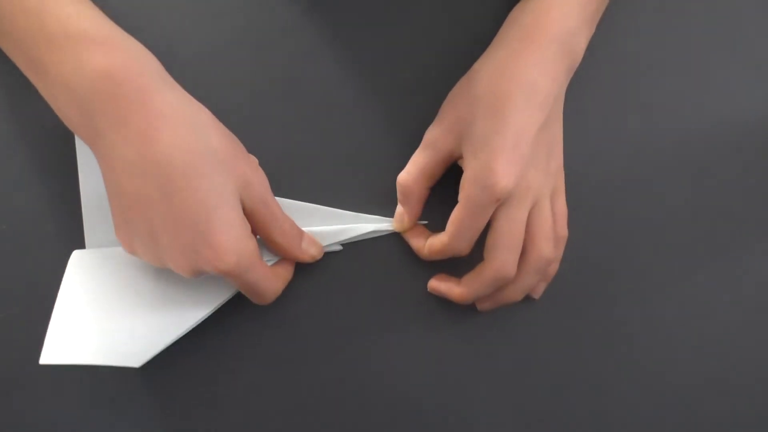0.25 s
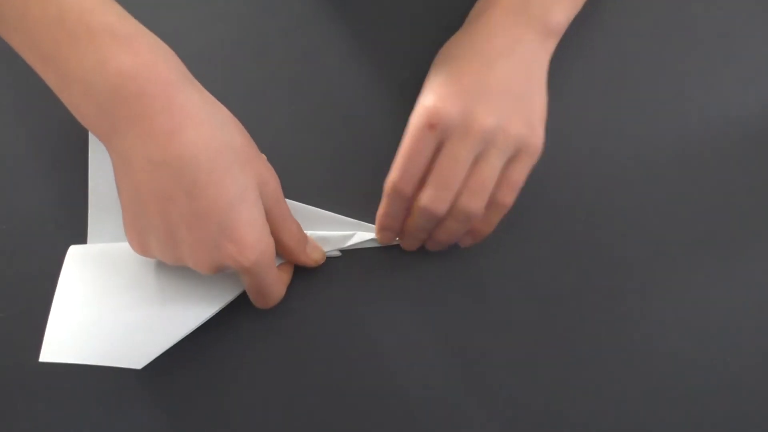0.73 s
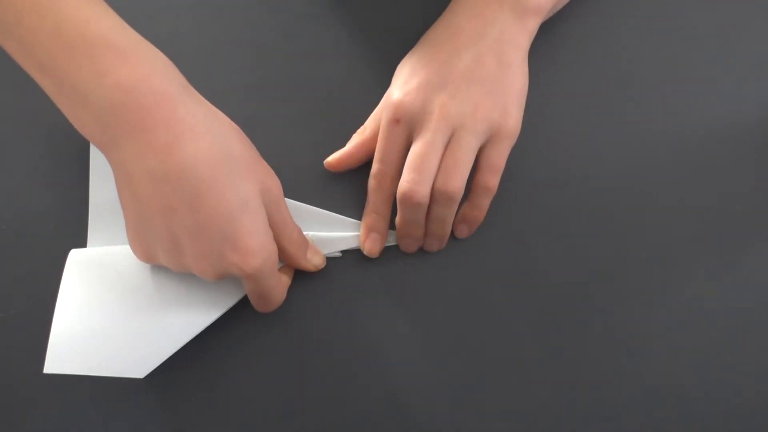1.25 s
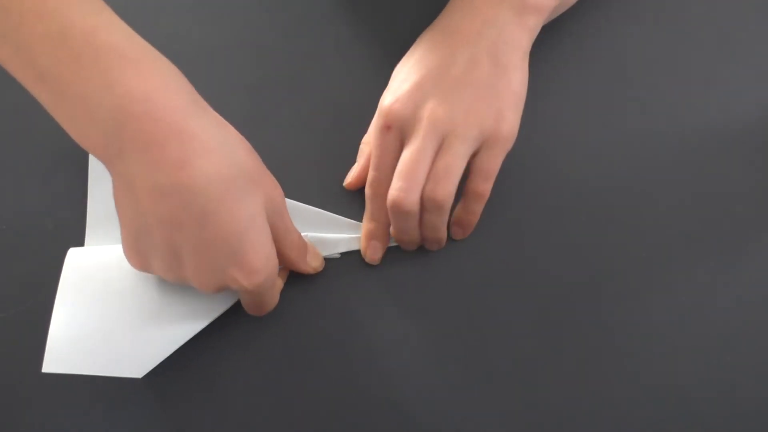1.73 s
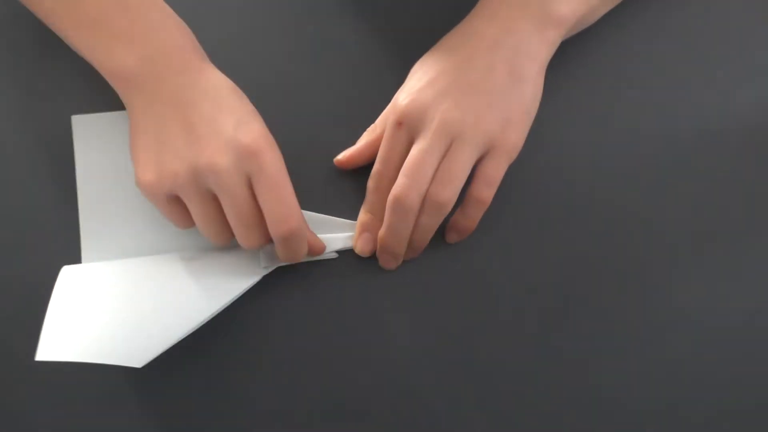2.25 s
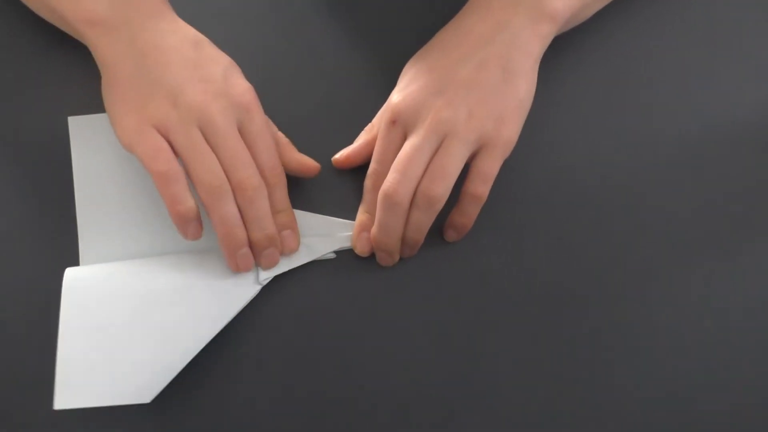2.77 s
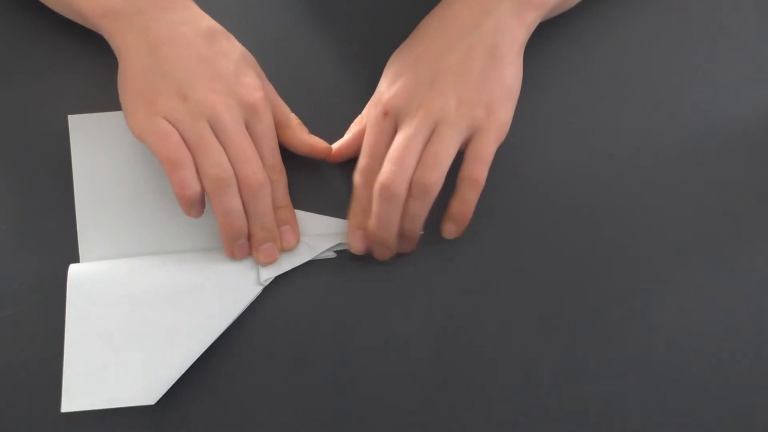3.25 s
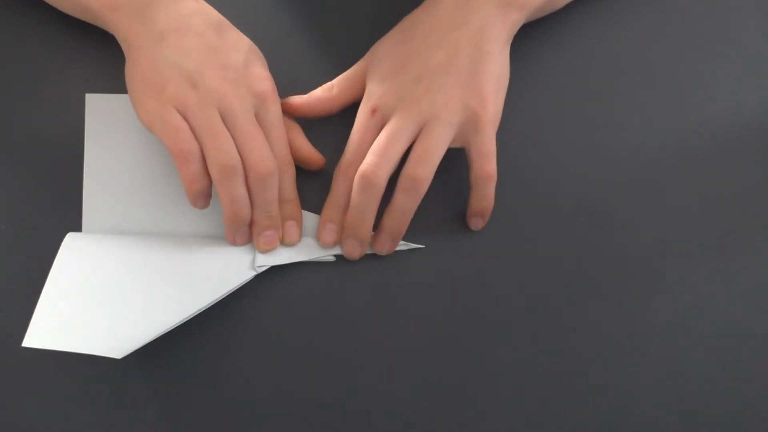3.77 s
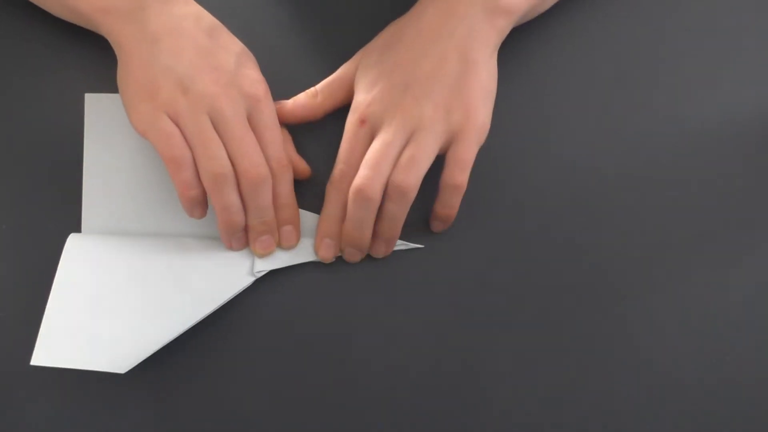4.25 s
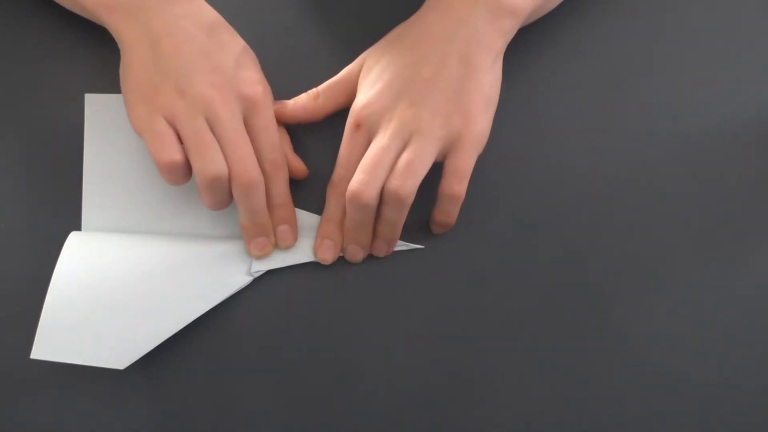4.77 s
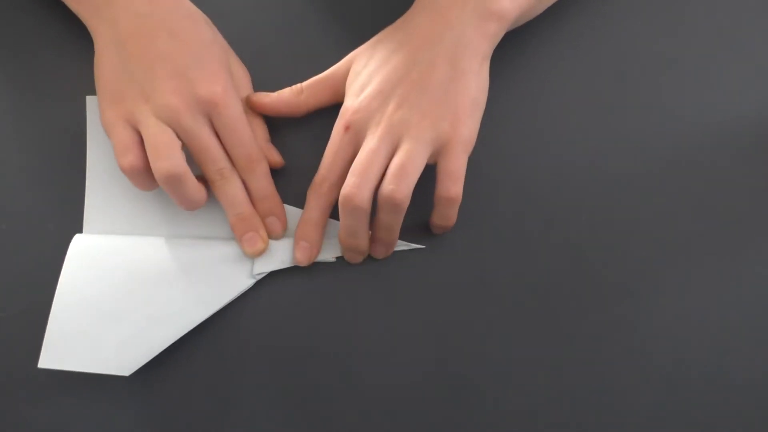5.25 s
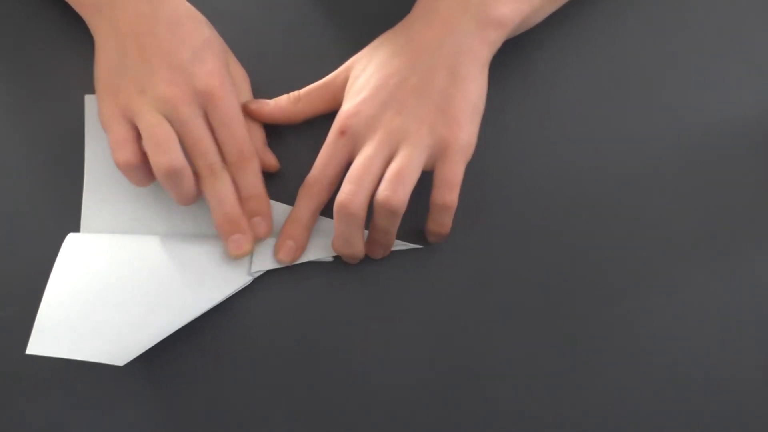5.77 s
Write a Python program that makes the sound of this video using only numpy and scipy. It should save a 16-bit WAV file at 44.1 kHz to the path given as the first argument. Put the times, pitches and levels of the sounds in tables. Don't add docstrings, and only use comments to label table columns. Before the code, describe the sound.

A quiet small room with soft hiss, deep rumble and a very faint electric whine; paper is handled close to the microphone. A crisp snap at 0.05 s opens, then light pinching crackles from 0.2 to 0.5 s. At 0.6 s a scuff of fingers and low table thuds begin the bending, with snaps near 0.7, 0.87 and 1.0 s and a knock and crackle around 1.35 s. The loudest, sharpest crease snap hits at 1.53 s, followed by quick hollow pops to 1.75 s and another crack at 1.8 s. Soft finger swishes run 2.1-2.5 s. A small press snap at 3.0 s leads into sparse ticks and a short bright skid at 3.6 s. A heavy, low cluster of thuds lands at 4.3 s, a bright crack with a duller one at 4.65 s, lesser crackles at 4.94 s, a soft thud at 5.3 s, a press snap at 5.63 s and a closing snap at 6.0 s.

```python
import sys
import numpy as np
from scipy import signal
from scipy.fft import rfft, irfft, next_fast_len
from scipy.io import wavfile
from scipy.ndimage import uniform_filter1d, minimum_filter1d

SR = 44100
rng = np.random.default_rng(int(sys.argv[2]) if len(sys.argv) > 2 else 0)


def pcm_store(signal):
    levels = np.round(np.clip(np.atleast_2d(signal), -1, 1) * 32767)
    wavfile.write(sys.argv[1], SR, levels.astype(np.int16).T)


def volts_from_db(level):
    exponent = np.asarray(level, float) / 20
    return 10 ** exponent


N = 265261


def evened(x):
    return x / np.sqrt(np.mean(x ** 2) + 1e-20)


def read(points, hz):
    f, value = np.transpose(points)
    return np.interp(np.log(hz + 1), np.log(f + 1), value)


def coloured(x, points):
    n = next_fast_len(x.shape[-1], real=True)
    gain = volts_from_db(read(points, np.fft.rfftfreq(n, 1 / SR)))
    return irfft(rfft(x, n) * gain, n)[..., :x.shape[-1]]


def add(mix, s, sound):
    part = mix[round(s * SR):][:len(sound)]
    part += sound[:len(part)]


# frequency in Hz, level in dB.
RUMBLE_SPECTRUM = [(15, -16), (30, 11), (50, 12), (70, 17), (95, -41)]


def building_rumble():
    return volts_from_db(-65.5) * evened(coloured(rng.standard_normal((2, N)), RUMBLE_SPECTRUM))


# frequency in Hz, level in dB per Hz.
AIR_SPECTRUM = [(12, -52), (20, -24), (86, -54), (124, -3), (147, -3), (211, -7), (403, -8.5), (565, -20),
                (1200, -14.5), (1940, -18.5), (2110, -12), (3600, -26), (9620, -28), (15400, -36),
                (16400, -48)]
# frequency in Hz, likeness from 0 to 1.
AIR_LIKENESS = [(60, 0.15), (180, 0.24), (550, 0.038), (1650, 0.083), (3600, 0.7), (5400, 0.82),
                (5800, 0.99), (9000, 1)]
# frequency in Hz, level in dB.
WHINE = [(2708, -67.5)]


def room_tone():
    hz = np.fft.rfftfreq(1024, 1 / SR)
    a, b, c, d, patches = rng.standard_normal((N // 256 + 5, 513, 5)).T
    patches = uniform_filter1d(patches, 10, axis=0)
    patches = evened(uniform_filter1d(patches, 12, axis=1))
    same = np.clip(read(AIR_LIKENESS, hz), -1, 1)[:, None]
    left = a + 1j * b
    right = same * left + np.sqrt(1 - same ** 2) * (c + 1j * d)
    spectra = np.array([left, right]) * volts_from_db(1.6 * patches)
    hiss = signal.istft(spectra, nperseg=1024, noverlap=768)[1][:, :N]
    wash = evened(coloured(hiss, AIR_SPECTRUM))
    t = np.arange(N) / SR
    whine = sum(volts_from_db(db + 4) * np.sin(2 * np.pi * hz * t) for hz, db in WHINE)
    return volts_from_db(-53) * wash + whine


# frequency in Hz, time to fall 60 dB in seconds.
WALL_DECAY = [(500, 0.37), (1500, 0.18), (4000, 0.27), (10000, 0.22)]
# delay in seconds, level in dB.
NEAR_ECHOES = [(.0012, -27), (.0045, -28), (.0098, -20.5), (.0125, -15), (.017, -28)]


def room(x, wet_db):
    taps = np.zeros((2, SR // 2))
    at = np.arange(400, SR // 2 - 20, 20) + rng.integers(0, 20, (2, (SR // 2 - 401) // 20))
    np.put_along_axis(taps, at, rng.choice([-1., 1.], at.shape), 1)
    hz, t, z = signal.stft(taps, SR, nperseg=256)
    decay = volts_from_db(-60 * t / read(WALL_DECAY, hz)[:, None])
    tail = signal.istft(z * decay, SR, nperseg=256)[1]
    tail *= volts_from_db(wet_db) / np.linalg.norm(tail[0])
    for k, (s, db) in enumerate(NEAR_ECHOES):
        echo = (-1) ** k * volts_from_db(db)
        tail[0, round(s * SR)] += echo
        tail[1, round(s * SR) + 3 * k] += echo
    return signal.fftconvolve(x[None], tail, axes=1)[:, :N]


USUAL_DB = -51
# time in seconds, effort in dB.
HAND_EFFORT = [(0.0, -46.5), (0.32, -49), (0.55, -45), (1.39, -44.5), (1.52, -44.5), (1.81, -53.5),
               (1.94, -42.5), (2.24, -66.5), (2.43, -48), (2.609, -62), (2.85, -57), (3.52, -54),
               (3.89, -55.5), (4.54, -50), (4.77, -56.5), (5.5, -53), (5.85, -50), (6.01, -51)]


def effort():
    return np.interp(np.arange(N) / SR, *np.transpose(HAND_EFFORT)) - USUAL_DB


# frequency in Hz, width in Hz, level in dB.
TABLE_MODES = [(118.3, 9.7, -8.5), (129.6, 14.7, -2), (164, 25.5, 0), (223.7, 20.2, -1), (281.5, 53, -2),
               (396, 30, -13), (467, 13, -21)]
# start in seconds, level in dB, hold in seconds, upper modes in dB.
HAND_LEANS = [(0.0, -52, 0.087, -2), (0.296, -58.5, .2, 6.5), (0.612, -37.5, .1, -11),
              (0.88, -47.5, 0.0087, -4.5), (1.03, -47.5, 0.1, -4.5), (1.37, -46.5, 0.018, 1),
              (1.547, -53.5, 0.16, 9.5), (1.97, -58, .04, -21), (2.275, -57, .01, -14),
              (2.46, -59, .01, -21), (2.89, -56, .11, -6), (3.656, -50.5, 0.033, -14),
              (3.914, -51.5, .01, 1), (4.298, -43.5, 0.05, -5), (4.668, -51, 0.009, -5.5),
              (5.355, -48, .04, -9), (5.623, -60, 0.036, 7.5), (5.83, -61, 0.026, 2)]
# start in seconds, level in dB, hardness from 0 to 1.
TABLE_THUDS = [(0.601, -38.5, 0.8), (0.642, -37, 0.4), (1.021, -45, 0.1), (1.364, -39, 0.88),
               (2.255, -39, 0.1), (3.0, -43, 0.34), (4.297, -29.5, 0.69), (4.3149, -35, 0.5),
               (4.341, -33, 0.4), (4.393, -31.5, 0.04), (5.299, -38.5, 0.2), (5.819, -40.5, 0.63)]


def table_top():
    t, now = np.arange(SR // 3) / SR, np.arange(N) / SR
    rise_db_s, fall_db_s, rest_db = 202, 192, -62
    s, db, hold, upper_db = np.transpose(HAND_LEANS)[..., None]
    before, after = np.maximum(s - now, 0), np.maximum(now - s - hold, 0)
    weight = volts_from_db(db - rise_db_s * before - fall_db_s * after)

    modes = [volts_from_db(level - 8.7 * np.pi * width * t) * np.sin(2 * np.pi * hz * t)
             for hz, width, level in TABLE_MODES]
    pushes = rng.standard_normal(N)
    low = evened(signal.oaconvolve(pushes, sum(modes[:2]))[:N])
    upper = evened(signal.oaconvolve(pushes, sum(modes[2:]))[:N])
    low_level = weight.sum(0) + volts_from_db(rest_db)
    upper_level = volts_from_db(-57.5 + 0.98 * effort()) + (volts_from_db(upper_db) * weight).sum(0)
    out = volts_from_db(-3.5) * (low_level * low + upper_level * upper)

    onset = 1 - np.exp(-t / 0.0032)
    for start, thud_db, hard in TABLE_THUDS:
        ring = sum(m * volts_from_db(7.5 * (hard - .5) * k) for k, m in enumerate(modes))
        add(out, start, volts_from_db(thud_db) * ring * onset)
    return coloured(out, [(40, -17), (75, -3.5), (105, -2.0), (600, 2.5)])


# start in seconds, length in seconds, frequency in Hz, level in dB.
SKIN_SQUEAK = (4.628, .015, 4850, -54)


def squeak():
    s, length, hz, db = SKIN_SQUEAK
    t, out = np.arange(0, length, 1 / SR), np.zeros(N)
    add(out, s, volts_from_db(db) * np.sin(2 * np.pi * hz * t) * np.hanning(len(t)) ** .5)
    return out


def friction(points, per_s, spread_db, clump_db):
    size = volts_from_db(spread_db * np.minimum(rng.exponential(1, N), 2))
    catches = size * (rng.random(N) < per_s / SR)
    clumps = uniform_filter1d(np.sqrt(catches), size=300)
    clumps = uniform_filter1d(clumps, size=200)
    grip = volts_from_db(clump_db * evened(clumps - clumps.mean()))
    scrape = grip * (0.43 * evened(catches) + 1) * rng.standard_normal(N)
    return evened(coloured(scrape, points))


# frequency in Hz, level in dB per Hz.
RUSTLE_SPECTRUM = [(290, -57), (500, -40), (1040, -1.5), (1560, -2.5), (2160, 0.5), (2370, -2.5),
                   (3270, -2.5), (8000, -20.5), (10400, -24), (17600, -120)]
# frequency in Hz, level in dB per Hz.
FIBRE_HISS_SPECTRUM = [(880, -11.5), (1500, -16), (2990, -9), (3800, -3), (5850, -8), (11300, -6.5),
                       (15500, -13.5), (16400, -38)]
# start in seconds, peak in dB, rise in seconds,
# length in seconds, brightness from 0 to 1.
FINGER_SKIDS = [(1.378, -42, .002, .04, 0.3), (0.692, -40, .002, .012, 0.15),
                (0.0185, -39, .002, .011, 0.05), (0.612, -44, .003, .026, 0.02),
                (3.008, -53, .003, .025, 0.02), (4.677, -42, .003, .012, 0.03),
                (0.585, -31.5, 0.00091, 0.056, 0.44), (0.844, -34, 0.003, 0.0096, 0.56),
                (0.987, -33, 0.0011, 0.0095, 0.3), (1.3655, -31, 0.002, 0.011, 0.25),
                (1.944, -39, 0.0037, 0.015, 0.52), (2.145, -47, 0.029, 0.042, 0.48),
                (2.221, -40.5, 0.062, 0.091, 0.5), (2.383, -43, 0.039, 0.05, 0.5),
                (2.468, -50, 0.012, 0.048, 0.48), (2.516, -50, 0.037, 0.12, 0.52),
                (3.26, -50, .001, 0.006, 1.), (3.606, -38.5, 0.0022, 0.044, 0.85),
                (3.898, -46, 0.002, 0.0065, 0.3), (3.916, -46, .002, 0.0063, 0.35),
                (4.4995, -49, .001, 0.0017, 0.85), (4.6425, -30, 0.0008, 0.005, 1.),
                (4.649, -40, .002, 0.023, 0.76), (4.665, -57, 0.0054, 0.067, 0.3),
                (4.693, -45, 0.0023, 0.0044, 1), (5.026, -54.5, .002, 0.014, 1.),
                (5.339, -49.5, .005, 0.043, 0.57), (5.601, -52, 0.0017, 0.0051, 0.7),
                (5.63, -48, .002, 0.057, 0.27), (5.788, -54, 0.012, 0.032, 0.8)]


def fingers():
    busy_db = effort()
    dull = volts_from_db(USUAL_DB + busy_db - 3.0)
    bright = volts_from_db(USUAL_DB - 12 + 0.99 * busy_db)
    for start, db, rise, length, shine in FINGER_SKIDS:
        u = np.arange(0, 2 * length, 1 / SR) / length
        swell = np.clip(u * length / rise, 0, 1)
        push = volts_from_db(db + 4.5 - 6.8 * u) * swell / (1 + u ** 12)
        add(dull, start, push * np.clip(1.1 - shine, 0, 1))
        add(bright, start, push * shine)
    rustle = friction(RUSTLE_SPECTRUM, per_s=1200, spread_db=8., clump_db=1.97)
    hiss = friction(FIBRE_HISS_SPECTRUM, per_s=5000, spread_db=5.0, clump_db=1.3)
    return dull * rustle + bright * hiss


# start in seconds, peak in dB, frequency in Hz,
# time to fall 60 dB in seconds.
AIR_POCKETS = [(0.051, -12, 2250, .013), (0.051, -13, 2750, .012), (0.322, -31, 850, .012),
               (0.3915, -29, 800, .012), (0.697, -26, 3100, .015), (0.7095, -25, 1250, .03),
               (0.743, -23, 1300, .025), (1.3325, -18, 2700, .013), (1.334, -21, 1050, .025),
               (1.3665, -28, 1000, .02), (1.572, -20, 1400, .025), (1.601, -20, 1300, .03),
               (1.655, -20, 1180, .035), (1.655, -24, 1840, .015), (1.680, -25, 1200, .025),
               (1.702, -23, 1200, .025), (1.725, -23, 1250, .03), (1.862, -27, 1300, .02),
               (1.927, -28, 1700, .02), (2.436, -36, 1000, .02), (2.565, -35, 1300, .02),
               (2.612, -37, 2550, .02), (2.994, -28, 1290, .025), (2.9935, -26, 3800, .016),
               (2.9935, -26, 4750, .016), (2.9935, -26, 2600, .016), (2.9935, -28, 1740, .018),
               (4.2742, -17, 2350, .015), (4.277, -30, 1300, .03), (4.643, -20, 10500, .008),
               (4.6565, -16, 1450, .03), (4.6565, -21, 2090, .02), (4.667, -30, 1500, .015),
               (4.94, -24, 1430, .025), (5.6295, -21, 1000, .025), (5.634, -27, 2450, .015),
               (5.6435, -24, 1370, .025), (5.643, -27, 2500, .02), (5.668, -29, 2450, .015)]


def pockets():
    out, t = np.zeros(N), np.arange(1500) / SR
    sag, shut = .12, .38
    onset = 1 - np.exp(-t / .0006)
    for s, db, hz, t60 in AIR_POCKETS:
        turns = np.cumsum(hz * (1 + sag * np.exp(-t / .002))) / SR
        fade_db = 60 * (t / (shut * t60)) ** 2
        add(out, s, volts_from_db(db - 3.2 - fade_db) * onset * np.sin(2 * np.pi * turns))
    return out


# frequency in Hz, level in dB.
SHEET_BODY = [(600, -40), (1000, 8), (1400, 14), (1800, 10), (2300, 13), (3200, 12), (4300, 3.5), (5500, 6),
              (7000, -6.5)]
# frequency in Hz, level in dB.
LOOSE_WING = [(450, -19.5), (700, -8.5), (1000, 1), (1250, -16.5), (1700, -37.5)]
# frequency in Hz, level in dB.
FIBRE_CRACK = [(2500, -5.5), (4500, 4), (6000, -3), (8000, -4.5), (11000, -9.5), (14000, -17), (16000, -34),
               (16600, -60)]


def snap(row, chance):
    s, db, centre_hz, treble_db, flap_db, width = row
    hz = np.fft.rfftfreq(2048, 1 / SR) + 1
    octaves_off = abs(np.log2(hz / centre_hz) / width)
    body = volts_from_db(read(SHEET_BODY, hz) - 6 * octaves_off ** 1.5)
    crack = volts_from_db(treble_db + 14.5 + read(FIBRE_CRACK, hz))
    flap = volts_from_db(flap_db + 13 + read(LOOSE_WING, hz))
    colour = body + crack + flap

    step, size, sign = chance.reshape(3, -1, 1)
    detour = .036 * (np.cumsum(step + .25, axis=0) - step[0] - .25)
    loss_db = 105 * detour * np.clip(4000 / hz, .6, 1) + (1.2 + 8 * size) * (detour > 0)
    late = 2 * (0.0552 + 0.593 * detour) * np.sqrt(hz) + 0.01418 * detour * hz
    spectra = colour * np.sign(sign - .5) * volts_from_db(-loss_db) * np.exp(-2j * np.pi * late)
    paths = irfft(spectra)[:, :1200]
    sound = paths.sum(0)
    sound = sound * volts_from_db(db) / abs(sound).max()
    plain = evened(paths[0]) * sound.std()
    return s - .0006, sound, plain


# start in seconds, peak in dB, centre in Hz, treble in dB, width in octaves.
HARD_CRACKS = [
    (0.0508, -9.5, 2300, -25, 0.53),
    (1.5263, 1.5, 3530, -21, 0.8),
    (1.8066, -10.5, 2930, -22, 1.09),
    (4.6432, -16, 5000, 0, 1.1),
    (4.655, -9.5, 2000, -40, 0.55),
    (5.628, -9, 2900, -18, 0.6),
    (6.0131, -8, 2150, -30, 0.4),
]
# start in seconds, peak in dB, centre in Hz, treble in dB.
PINCH_SNAPS = [
    (0.0205, -28, 1300, -24),
    (0.184, -34, 2710, -1),
    (0.291, -18, 2600, -34),
    (0.321, -21, 2500, -36),
    (0.346, -16.5, 2600, -34),
    (0.3905, -13.5, 2600, -28),
    (0.446, -20.5, 2040, -46),
    (0.493, -34, 1220, -25),
    (0.504, -23.5, 2280, -21),
]
# start in seconds, peak in dB, centre in Hz, treble in dB.
BEND_SNAPS = [(0.588, -19.5, 3410, -18), (0.603, -26, 1130, -18), (0.689, -11, 2380, -34),
              (0.709, -22.5, 1350, -34), (0.742, -19.5, 1300, -27), (0.869, -17, 2120, -31),
              (0.992, -9.5, 2350, -40), (1.094, -28, 1010, -37), (1.207, -30, 985, -40),
              (1.332, -16, 1500, -16), (1.372, -11, 2900, -15), (1.408, -33, 1340, -8),
              (1.473, -21, 3030, -46)]
# start in seconds, peak in dB, centre in Hz, treble in dB.
SQUEEZE_SNAPS = [(1.548, -14, 1820, -23), (1.571, -10, 1850, -24), (1.6, -11.5, 1750, -28),
                 (1.654, -13.5, 1900, -28), (1.679, -19, 1800, -34), (1.701, -18.5, 1800, -36),
                 (1.724, -18, 1750, -29), (1.861, -21.5, 3200, -10), (1.879, -27, 1070, -18),
                 (1.926, -15, 2100, -48), (1.945, -30, 1910, -22), (2.091, -31, 1970, -21),
                 (2.168, -25.5, 2600, -32), (2.435, -32.5, 1010, -25)]
# start in seconds, peak in dB, centre in Hz, treble in dB.
FLATTEN_SNAPS = [(2.5, -26, 2960, -42), (2.547, -32, 1400, -29), (2.564, -29, 1460, -31),
                 (2.611, -32, 2550, -16), (2.9932, -22, 2200, -16), (3.302, -33, 3250, -1),
                 (3.312, -23, 2460, -14), (3.53, -29, 1090, -18), (3.545, -33, 1400, -26),
                 (4.274, -19, 3000, -12), (4.294, -28, 3010, -14), (4.305, -27, 3580, -17),
                 (4.316, -26.5, 2460, -16), (4.333, -26.5, 1980, -15), (4.46, -31, 2170, -39),
                 (4.486, -29, 2740, -38), (4.923, -24.5, 2300, -13.5), (4.939, -17, 2080, -38),
                 (4.96, -29, 1360, -26), (5.354, -27.5, 2140, -18), (5.481, -30, 2170, -29),
                 (5.64, -22, 1500, -30), (5.669, -29, 2360, -18), (5.783, -27, 3340, -32)]
# start in seconds, peak in dB, centre in Hz.
SETTLING_TICKS = [(3.129, -41, 2770), (3.161, -43, 2710), (3.246, -35, 3430), (3.359, -39, 2470),
                  (3.407, -34, 2410), (3.443, -39, 3900), (3.597, -34.5, 2400), (3.87, -39, 2550),
                  (3.89, -36, 1170), (4.009, -38.5, 1580), (4.092, -38, 2360), (4.222, -39.5, 1150),
                  (4.377, -39, 2050), (5.11, -37.5, 1470), (5.144, -36.5, 2420), (5.167, -39.5, 2400),
                  (5.234, -41, 2250), (5.296, -41, 2510), (5.307, -36, 2580), (5.316, -35, 2450),
                  (5.389, -35.5, 2630), (5.443, -34.5, 2390), (5.463, -38, 2600), (5.768, -32.5, 4200),
                  (5.798, -36, 2380), (5.968, -38, 2710)]
# start in seconds, peak in dB, centre in Hz, treble in dB.
CREASE_SLIPS = [
    (0.061, -30, 2200, -10),
    (0.0765, -31, 2200, -20),
    (1.8445, -33, 4000, -8),
    (1.907, -36, 1800, -20),
    (2.236, -38, 2900, -15),
    (2.257, -35, 2180, -25),
    (3.003, -35, 4500, -14),
    (3.007, -36, 3200, -20),
    (4.653, -20, 3500, -30),
    (4.662, -28, 3000, -12),
]


def creases():
    out, aside, around = np.zeros(N), np.zeros(N), np.zeros(N)
    ticks = [(*row, -23) for row in SETTLING_TICKS]
    # snaps, loose wing in dB (weaker once the sheet is held down), width in octaves
    gestures = [(PINCH_SNAPS, -8, 0.75), (BEND_SNAPS, -6, 0.91), (SQUEEZE_SNAPS, -8.5, 0.88),
                (FLATTEN_SNAPS, -14.5, 0.93), (ticks, -12, 0.68)]
    rows = [(*row, -15, width) for *row, width in HARD_CRACKS]
    rows += sorted((*row, flap_db, width) for snaps, flap_db, width in gestures for row in snaps)
    rows += [(*row, -20, .7) for row in CREASE_SLIPS]
    for row, chance in zip(rows, rng.random((len(rows), 37))):
        s, sound, plain = snap(row, chance[1:])
        add(out, s, sound)
        add(aside, s, .26 * (chance[0] - .5) * sound)
        add(around, s, plain)
    rings = pockets()
    return out + rings, coloured(aside, [(3000, -2.5), (8000, 4.5)]), around + volts_from_db(-3) * rings


# frequency in Hz, side level in dB.
STEREO_WIDTH = [(100, -2.5), (300, 0.6), (2000, -4.5), (4500, -2), (7000, -18.5), (15000, -22)]
# frequency in Hz, left minus right in dB.
STEREO_LEAN = [(60, 0.4), (150, 0.6), (380, -4.5), (950, 4), (2380, 3), (5980, 1), (15000, 0.5)]


def scene():
    paper, aside, around = creases()
    hands = fingers() + squeak() + table_top()
    left, right = paper + hands + room(around + hands, wet_db=-10.0)
    mid = (left + right) / 2
    side = coloured((left - right) / 2, STEREO_WIDTH) + aside
    hz, db = np.transpose(STEREO_LEAN)
    pair = [coloured(mid + way * side, np.transpose([hz, way * db / 2])) for way in (1, -1)]
    return np.array(pair) + room_tone() + building_rumble()


def band_limit(x):
    return signal.sosfilt(signal.butter(12, 16540, fs=SR, output="sos"), x)


def record(dry):
    peak_db = 20 * np.log10(abs(dry).max(0) + 1e-9)
    ahead_db = -minimum_filter1d(-peak_db, size=1101, origin=-550, mode="nearest")
    rise = np.arange(N) * 60. / SR
    held_db = np.maximum.accumulate(ahead_db + rise) - rise
    over_db = np.maximum(held_db + 5.8, 0)
    limited = dry / volts_from_db(uniform_filter1d(over_db, size=120))
    return band_limit(coloured(limited, [(16200, 0), (16600, -70)]))


dry = scene()
out = record(dry)
pcm_store(out)
```